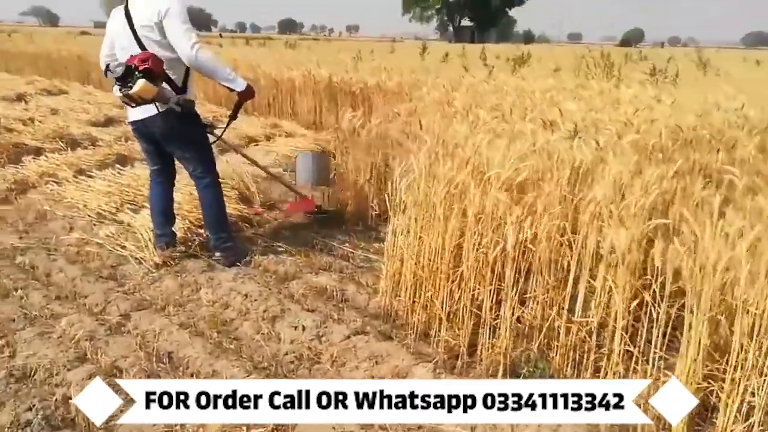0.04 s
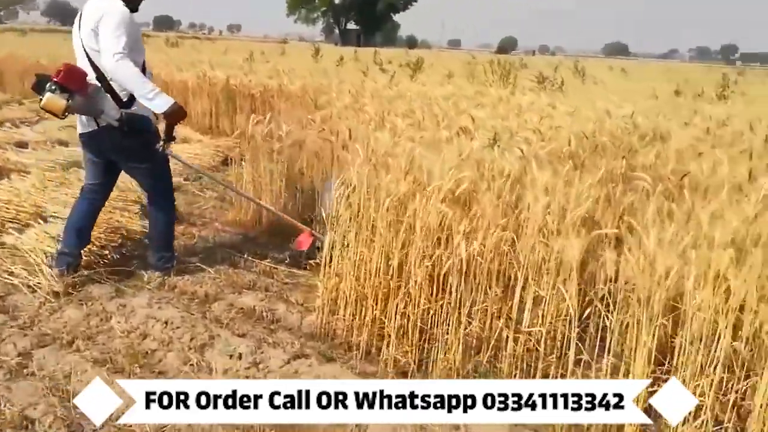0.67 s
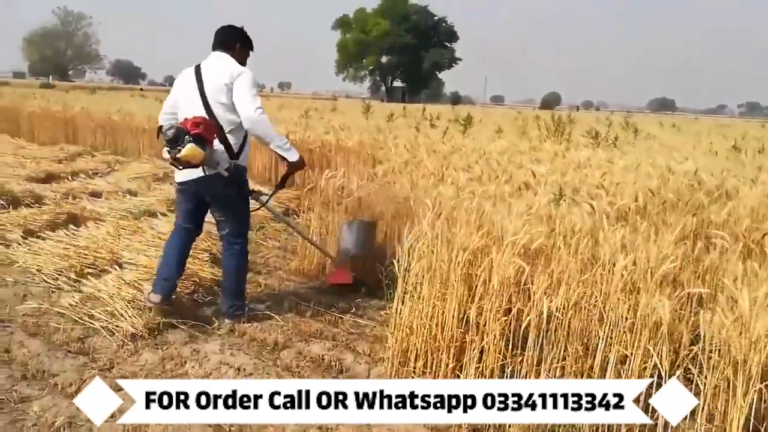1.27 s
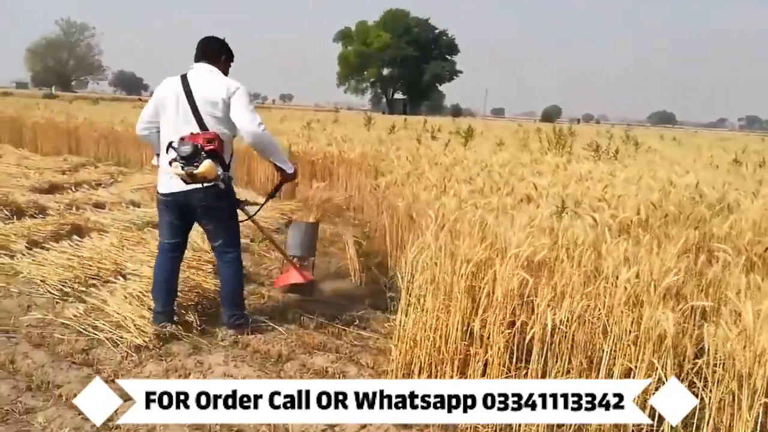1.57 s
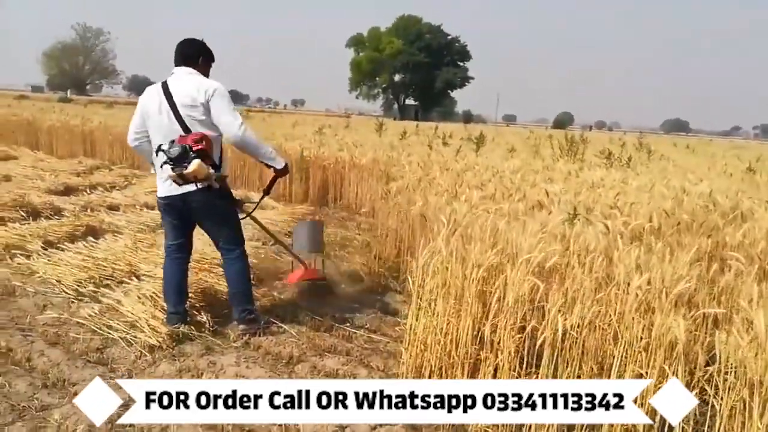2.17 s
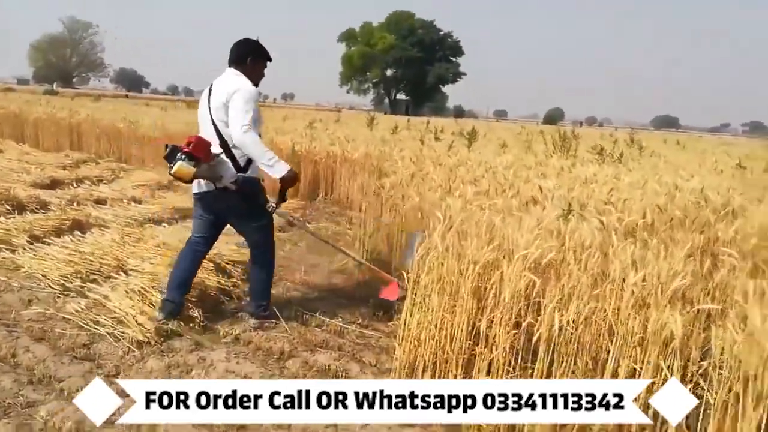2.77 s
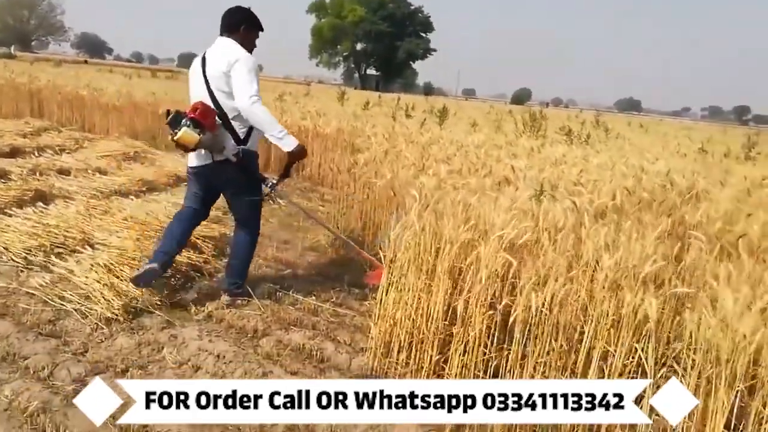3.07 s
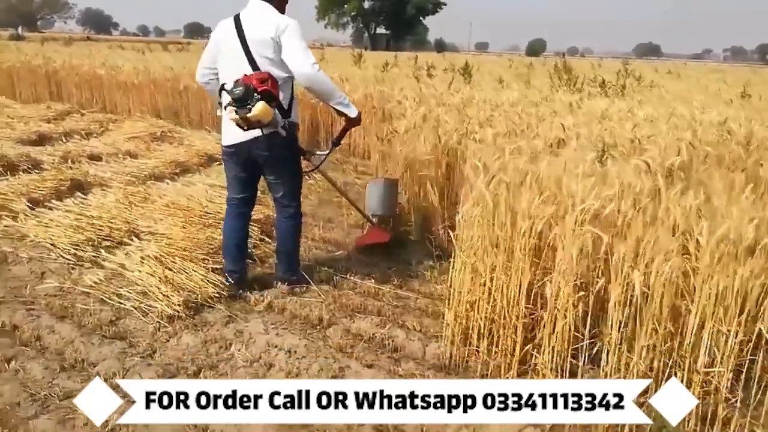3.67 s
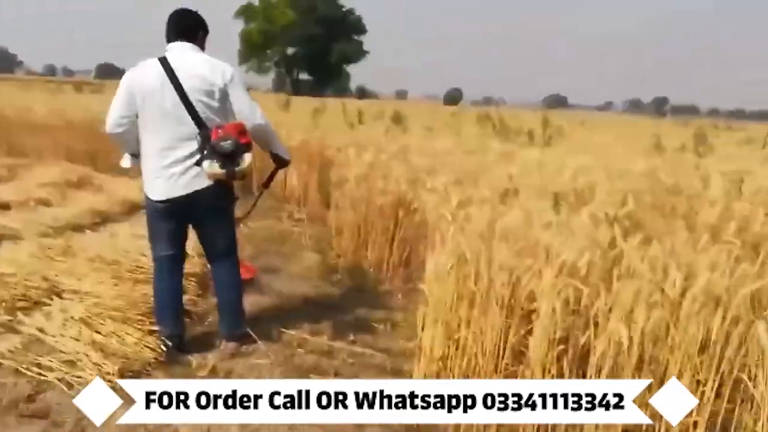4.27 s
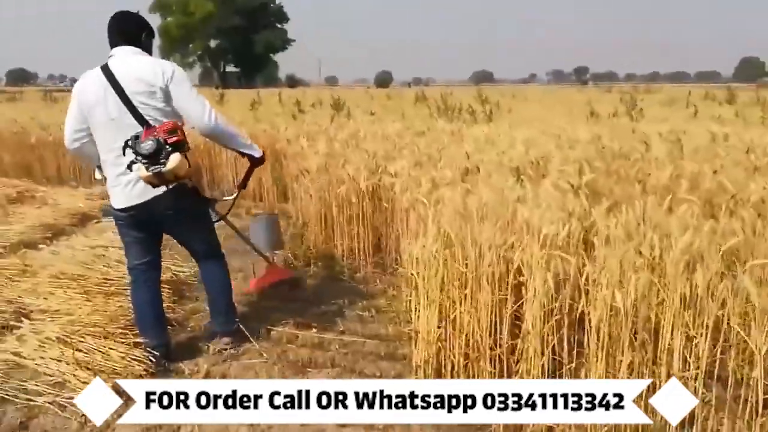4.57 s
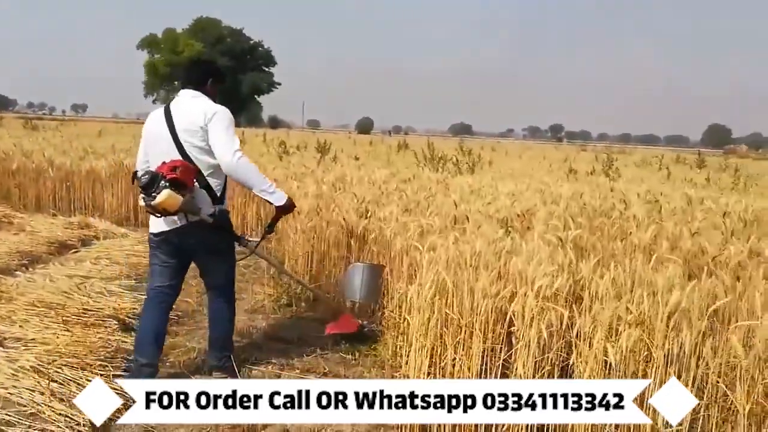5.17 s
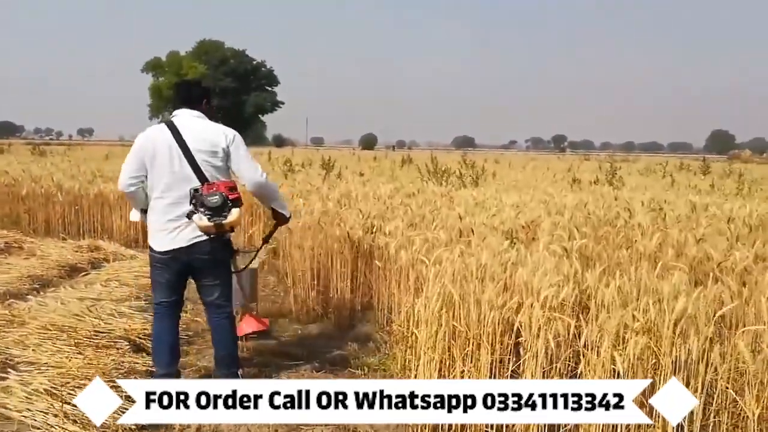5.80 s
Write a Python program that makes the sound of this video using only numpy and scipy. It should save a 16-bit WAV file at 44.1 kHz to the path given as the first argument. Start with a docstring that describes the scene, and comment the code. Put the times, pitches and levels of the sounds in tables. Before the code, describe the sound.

A petrol brush cutter runs throughout, a few metres from a phone microphone in an open field. Its small engine makes a buzzing drone with a fast rattle, whirring gears and a thin blade whine, over a light hiss of straw. The pitch climbs slightly during the first second. From about 1 to 2 seconds the toothed blade rips through dry wheat in a run of bright zings and crackles, and the engine sags to its lowest pitch. The shaft chatters in quick fits from roughly 1.5 to 2.3 seconds. The engine recovers by 3.2 seconds, then a second cluster of cuts from 3.3 to 4 seconds pulls it down a little, with a metallic rasp. It rises again, slightly louder, before a last series of sharp zings and tearing stalks from about 5.2 to 5.9 seconds. The engine is still running at the end.

```python
"""Brush cutter in dry wheat.

A four-stroke brush cutter mows an open field, a few metres from a phone. Gas pulses thud and valves
rattle the casing each cycle. The engine sags under load; gears whirr, the shaft chatters at low speed.
On each swing the saw teeth rip through stalks with a bright zing, and falling straw crackles."""
import sys
import numpy as np
from scipy import signal
from scipy.fft import rfft, irfft, next_fast_len
from scipy.io import wavfile
from scipy.ndimage import uniform_filter1d

SR = 44100
rng = np.random.default_rng(int(sys.argv[2]) if len(sys.argv) > 2 else 0)


def waveform_to_disk(signal):
    """Save audio, clipped to [-1, 1], as 16-bit WAV at the path in sys.argv[1]."""
    frames = np.transpose(np.atleast_2d(signal))
    scaled = np.clip(frames, -1, 1) * 32767
    samples = np.round(scaled).astype(np.int16)
    wavfile.write(sys.argv[1], SR, samples)


N = 261954
STEP = 32  # samples per control value
CRUISE_HZ = 46
TEETH_PER_FIRING, MESH_PER_FIRING, BLADE_TEETH = 60.2, 30.4, 40

# firing rate, sagging in each cut (time [s], rate [Hz])
FIRING_HZ = [(0.0, 47.61), (0.4, 48.9), (0.78, 50.08), (1.02, 50.38), (1.11, 48.78), (1.32, 48.24),
             (1.45, 45.66), (1.6, 42.9), (1.97, 40.69), (2.3, 43.0), (2.55, 44.43), (2.78, 46.0),
             (3.13, 47.87), (3.29, 48.39), (3.52, 45.98), (3.78, 45.19), (4.04, 43.72), (4.28, 45.18),
             (4.52, 46.11), (4.8, 47.05), (5.06, 48.07), (5.39, 47.47), (5.55, 46.74), (5.71, 45.72),
             (5.94, 45.54)]
# worker's swing: 0 = blade out, 1 = blade hidden, muffler facing (time [s], turn [0-1])
TURN = [(0, 0.27), (.75, 0.32), (1.3, 0.31), (2, 0.4), (2.5, 0.034), (3.1, 0.099), (3.6, 0.11), (4.2, 0.84),
        (4.5, 0.76), (5, 0.44), (5.45, 0.38), (5.94, 0.73)]
# exhaust swell (time [s], level [dB])
SWELL_DB = [(0, -3), (1.1, -1), (1.8, -2.5), (2.15, -1.1), (3.1, 1), (4.2, 1), (5.4, 2.5), (5.94, 0.5)]
# part: (base gain [dB], speed slope [dB/Hz], gain at full turn [dB], swell weight [ratio])
PART_GAINS = {"drone": (-38, 0.23, -0.4, 0.5), "note": (-0.43, 0.03, 0.12, 1), "bark": (.5, .45, 0, 0),
              "buzz": (1, 0, 0, 0), "chuff": (-37.5, -.1, 3.5, 0.3), "gears": (-39.5, -.2, 3, -.3),
              "rattle": (-24.5, 0.09, -7.5, 0.62), "fittings": (-39, -0.1, -5, -1),
              "straw": (-26, 0.44, -3, 0.78), "air": (-40.5, -0.13, -1.5, 0.9)}

# Order = multiple of the firing rate.
# muffler drone (order [1], level [dB], phase [cycles])
DRONE_LINES = [(1, -12.5, 1), (2, -1, 0.34), (3, -9.5, 0.31)]
# gas pulses (phase [cycles], level [dB])
GAS_PULSES = [(.475, 2), (.14, -2.5), (.77, -7)]
# exhaust note (order [1], level turned away [dB], level facing [dB])
NOTE_LINES = [(4, -51.5, -47.5), (5, -51.5, -45.5), (6, -49, -40.5), (7, -49, -46), (8, -45, -46),
              (9, -47, -48), (10, -49, -55), (11, -42, -55.5), (12, -57, -76)]
# hard edge of the exhaust pulse (order [1], level turned away [dB], level facing [dB])
BARK_LINES = [(14, -58.5, -63.5), (15, -66, -61), (16, -67, -53), (17, -65, -43), (18, -51, -48),
              (19, -56, -41.5), (20, -58, -40), (21, -48, -59)]
# bark envelope (time [s], gain [dB])
BARK_DB = [(0, 0.5), (4.1, 2.5), (5.4, -2.5), (5.94, 1)]
# muffler shell buzz (order [1], level turned away [dB], level facing [dB])
BUZZ_LINES = [(23, -53.5, -50.5), (24, -56, -40.5), (25, -46.5, -45.5), (26, -39.5, -52.5),
              (27, -47.5, -47), (28, -48, -75), (29, -46, -73), (33, -47.5, -44), (34, -43, -62),
              (35, -38.5, -63), (36, -46.5, -47), (37, -65, -72)]
# buzz envelope (time [s], gain [dB])
BUZZ_DB = [(0, -17), (1.9, -7), (2.6, -7), (3.3, 1), (4.2, -0.5), (5.2, -1.5), (5.5, 3.5), (5.7, -1),
           (5.94, -2)]
# gas noise bursts (phase [cycles], level [dB])
CHUFFS = [(0.41, -4.5), (0.53, -7), (0.16, -8), (0.76, -11.5)]
# muffler outflow spectrum (frequency [Hz], gain [dB])
CHUFF_SPECTRUM = [(300, -18), (620, -30), (850, -6.5), (1400, -3), (2000, -3.5), (3000, -3), (6000, -32),
                  (16000, -47)]

# fin and shaft tube modes (frequency [Hz], width [Hz], level [dB])
FIN_MODES = [(3680, 160, 2), (4020, 160, -18), (5260, 210, 1), (5730, 130, -12), (6200, 130, -0.5),
             (6450, 150, -2), (7130, 170, 1), (7450, 110, -1), (8050, 250, -6)]
# their ringing (time [s], level [dB])
FIN_DB = [(0, -36), (1.2, -38), (2, -35.5), (2.6, -37.5), (3.2, -46), (3.95, -28), (4.2, -35), (4.45, -40),
          (4.8, -29.5), (5.3, -35.5), (5.72, -33), (5.94, -36)]
# valve and piston knocks (phase [cycles], level [dB])
KNOCKS = [(.13, 5.5), (.4, 5.5), (0.501, 6.5), (0.721, 14.5), (0.899, 1.5)]
# casing response (frequency [Hz], gain [dB])
CASING_SPECTRUM = [(300, -47), (650, -31), (900, -7), (1350, 2.5), (1650, -.5), (1950, -1), (2300, 2.5),
                   (2800, 1.5), (3400, -3), (4500, -2), (6500, -12.5), (10000, -5), (16000, -16)]
# echoes off worker, guard and soil (delay [s], gain [dB])
ECHOES = [(.00115, -15), (.0022, -13), (.0037, -14)]
# cowl and guard modes (frequency [Hz], width [Hz], level [dB])
FITTING_MODES = [(2124, 90, -7.5), (2593, 100, -14), (2850, 130, -14)]
# gear whirr (order [1], level [dB])
GEAR_LINES = [(28, 4.5), (30, 5.5), (31, 0), (36, -8), (39, -14), (42, -4), (44, -0.5), (45, 4), (49, -12),
              (56, -15)]
# cooling air spectrum (frequency [Hz], gain [dB])
AIR_SPECTRUM = [(20, -25), (38, -21), (60, -19), (100, -2), (145, -0.5), (210, -6.5), (450, -5.5),
                (620, -17.5), (1000, -6.5), (3000, -48)]
# gear head whine (time [s], level [dB])
MESH_DB = [(0, -43), (.5, -36), (.9, -39), (1.5, -47), (2.2, -45), (2.6, -34), (3.3, -37), (4.05, -37),
           (4.6, -45), (5.5, -43), (5.85, -35)]
# fits of shaft chatter (start [s], peak [dB])
CHATTER_FITS = [(1.555, -27), (1.6142, -25), (1.6656, -26), (1.72, -25), (1.7752, -24.5), (1.8244, -25),
                (1.876, -29), (1.9275, -26), (1.9759, -25.5), (2.0497, -29), (2.1031, -24.5), (2.1742, -28),
                (2.2488, -25), (2.3092, -28)]

# straw hiss spectrum (frequency [Hz], gain [dB])
STRAW_SPECTRUM = [(1000, -35.5), (3000, -2), (4000, -4), (4700, -3), (5700, 5), (7300, 5), (9000, -1),
                  (10500, -1), (11800, -2), (13000, -2.5), (14000, 0), (16000, -7.5)]
# free blade whine (time [s], level [dB])
WHINE_DB = [(0, -42), (.33, -38), (.45, -32), (.75, -31.5), (.95, -33.5), (1.09, -28), (1.22, -35),
            (1.47, -30), (1.62, -37), (1.9, -34), (2.3, -33), (2.5, -37), (2.8, -34), (3.1, -36),
            (4.4, -41), (5.94, -32)]
# blade meets stalks (centre [s], half length [s], level [dB], zing share [0-1], favoured harmonic [1])
CUTS = [(1.038, 0.017, -20, .85, 2), (1.078, 0.03, -15.5, 0.65, 4.5), (1.177, 0.018, -19.5, 0.4, 4),
        (1.35, 0.03, -17.5, 0.8, 3.5), (1.445, 0.093, -24, 0.24, 2.5), (1.561, 0.026, -21, 0.22, 5),
        (1.642, 0.042, -25.5, 0.3, 3), (1.75, 0.023, -29.5, 0.35, 5), (1.855, 0.037, -34, 0.4, 5),
        (1.925, 0.042, -28.5, 0.1, 5), (3.289, 0.012, -21, 0.7, 3), (3.336, 0.026, -14.5, 0.65, 5),
        (3.41, .035, -25, 1, 5), (3.438, 0.051, -20.5, 0.66, 3), (3.517, 0.064, -23.5, 0.2, 2),
        (3.725, 0.023, -21, 0.1, 4), (3.771, 0.021, -19.5, 0.2, 4), (3.945, 0.13, -26, 0, 4),
        (5.174, 0.061, -25, 0.5, 2), (5.431, 0.012, -17, 0.76, 4), (5.447, 0.0067, -10, 1, 4),
        (5.489, 0.019, -12.5, 0.55, 4), (5.53, 0.029, -26.5, .07, 3), (5.564, 0.014, -18.5, 0.4, 4),
        (5.672, 0.011, -22.5, 0.7, 4), (5.887, 0.026, -28, 1, 4)]
# tooth zing (tooth rate harmonic [1], level [dB])
ZING_LINES = [(1, -15), (2, -14.5), (3, -5), (4, -16), (5, -3.5)]
# steel blade response (frequency [Hz], gain [dB])
PLATE_SPECTRUM = [(2000, 5), (3000, -1.5), (4400, -5), (5750, 8.5), (7000, 8.5), (8600, -1.5), (10000, 7),
                  (11500, 8), (12800, 1), (14400, -9.5), (16000, -4)]
# tearing stalk spectrum (frequency [Hz], gain [dB])
RIP_SPECTRUM = [(500, -36), (1500, 0), (2900, 6), (3500, 1), (4500, -1), (5800, 8), (8500, 7.5),
                (10000, 7.5), (11500, 7.5), (13000, 7), (16000, -10)]
# cutting noise balance (time [s], left minus right [dB])
CUT_PAN_DB = [(0, 2.5), (1.1, 0), (1.35, 0), (3.2, 1), (3.5, 0), (4.05, 3.5), (5.25, -1), (5.47, -1),
              (5.94, -2.5)]
# microphone port shading (frequency [Hz], left minus right [dB])
PORT_SHADING = [(450, -6.5), (700, 8), (950, 2), (1300, -0.5), (1750, -9), (2300, -4), (2800, -1),
                (3300, -4), (4400, -0.5), (6200, 6), (8500, -0.5), (11000, -4), (15000, -8)]


def amp(db):
    """Decibels to gain."""
    return 10 ** (np.asarray(db) / 20)


def unit(x):
    """Scale to rms 1."""
    return x / np.sqrt(np.mean(x ** 2))


def curve(table):
    """Breakpoints to one value per sample."""
    return np.interp(np.arange(N) / SR, *np.transpose(table))


def hold(x, size=STEP):
    """Control rate to sample rate."""
    return np.repeat(x, size)[:N]


def walk(rate_hz):
    """Smooth random drift, rms 1."""
    size = max(int(SR / rate_hz / 100), 1)
    span = max(int(SR / rate_hz / size), 1)
    steps = np.diff(rng.standard_normal(N // (span * size) + 2), prepend=0)
    ramps = np.cumsum(np.repeat(steps / span, span))
    return hold(unit(uniform_filter1d(ramps, span // 2 + 1)), size)


def noise():
    """Independent white noise per port."""
    return rng.standard_normal((2, N))


def colour(x, spectrum, size=8192):
    """Minimum-phase filter with the given response."""
    hz, db = np.transpose(spectrum)
    grid_hz = np.maximum(np.fft.rfftfreq(size, 1 / SR), 1)
    cepstrum = irfft(np.log(amp(np.interp(np.log(grid_hz), np.log(hz), db))))
    cepstrum[1:size // 2] *= 2
    cepstrum[size // 2 + 1:] = 0
    response = irfft(np.exp(rfft(cepstrum)))
    return signal.fftconvolve(np.atleast_2d(x), response[None], axes=1)[:, :N]


def pan(db):
    """Port gains for a left-minus-right balance."""
    return amp(np.array([db, -db]) / 2)


def from_left(x, lag_s=0.00014):
    """Direct sound reaches the right port later."""
    x, size = np.ravel(x), next_fast_len(N, real=True)
    delay = np.exp(-2j * np.pi * np.fft.rfftfreq(size, 1 / SR) * lag_s)
    return np.array([x, irfft(rfft(x, size) * delay, size)[:N]])


def scatter(x, tail_s, wet_share):
    """Direct sound plus a spray of reflections off soil and stalks."""
    t = np.arange(SR // 20) / SR
    spray = rng.standard_normal((2, len(t))) * np.exp(-t / tail_s)
    spray /= np.linalg.norm(spray, axis=1, keepdims=True)
    wet = signal.fftconvolve(np.atleast_2d(x), spray, axes=1)[:, :N]
    return np.sqrt(1 - wet_share) * unit(from_left(x)) + np.sqrt(wet_share) * unit(wet)


def moving_echoes(x, drift_s=0.00011):
    """Echo paths drift as the worker moves; peaks and dips wander."""
    at = np.arange(N)

    def echo(port, delay_s):
        return np.interp(at - SR * (delay_s + drift_s * walk(1.2)), at, port)

    return unit(np.array([port + sum(amp(db) * echo(port, s) for s, db in ECHOES) for port in x]))


def part_gain(part):
    """Gain from engine speed, turn and exhaust swell."""
    base_db, db_per_hz, turned_db, weight = PART_GAINS[part]
    hz, turn, swell_db = (curve(table)[::STEP] for table in (FIRING_HZ, TURN, SWELL_DB))
    return hold(amp(base_db + db_per_hz * (hz - CRUISE_HZ) + turned_db * turn + weight * swell_db))


def surge(cycle, depth_db, phase):
    """Gain swelling once a cycle, peaking at phase."""
    return unit(hold(amp(depth_db / 2 * np.cos(2 * np.pi * (cycle[::STEP] - phase)))))


def throb(cycle, depth_db, phase):
    """Gain jumping at each firing, sinking until the next."""
    age = (cycle - phase) % 1
    return unit(uniform_filter1d(amp(-depth_db * age), SR // 500))


def valve_pop(cycle):
    """Steady gain with a bump as the exhaust valve opens."""
    age = (cycle - GAS_PULSES[0][0] + .5) % 1 - .5
    return unit(1 + .8 * np.exp(-(age / .13) ** 2))


def pulse_lines(cycle, lines, waver, lead_cycles=0):
    """Firing harmonics peaking on the gas pulses; their balance follows the turn."""
    out, angle = 0, 2 * np.pi * (cycle + lead_cycles)
    turn = curve(TURN)[::STEP]
    for order, away_db, facing_db in lines:
        pulses = sum(amp(db) * np.exp(-2j * np.pi * order * phase) for phase, db in GAS_PULSES)
        gain = hold(np.sqrt(2) * amp(away_db + turn * (facing_db - away_db)))
        out -= gain * wavering(order * angle + np.angle(pulses), waver, rate_hz=14)
    return out


def wavering(angle, depth, rate_hz):
    """Tone drifting in level and phase."""
    return np.cos(angle) * (1 + depth * walk(rate_hz)) + np.sin(angle) * depth * walk(rate_hz)


def exhaust(cycle, jitter_cycles=0.0016, spread_db=1.1, chuff_cycles=0.028):
    """Gas pulses bark over a drone; as the valve opens, gas chuffs out and the muffler shell buzzes."""
    drone = sum(amp(db + 0.29 * walk(25.1)) * np.cos(2 * np.pi * order * (cycle - phase))
                for order, db, phase in DRONE_LINES)
    note = pulse_lines(cycle, NOTE_LINES, waver=0.095)
    uneven = cycle + jitter_cycles * walk(70)
    strength = amp(spread_db * walk(70))
    bark = pulse_lines(uneven, BARK_LINES, waver=0.22, lead_cycles=0.04) * amp(curve(BARK_DB))
    buzz = pulse_lines(uneven, BUZZ_LINES, waver=0.59, lead_cycles=0.0422) * amp(curve(BUZZ_DB))
    bursts = sum(amp(db) * np.exp(-(((cycle - phase + .5) % 1 - .5) / chuff_cycles) ** 2)
                 for phase, db in CHUFFS)
    chuff = unit(colour(rng.standard_normal(N) * bursts, CHUFF_SPECTRUM))
    smooth = unit(drone) * part_gain("drone") + note * part_gain("note")
    rough = bark * part_gain("bark") + buzz * part_gain("buzz") + chuff * part_gain("chuff")
    return from_left(smooth + rough * strength)


def fins(cycle):
    """Each firing shakes a metallic rasp from fins and shaft tube; the modes trade strength."""
    t = np.arange(N) / SR
    ring = 0
    for hz, width_hz, db in FIN_MODES:
        tone = amp(db + 3.5 * np.tanh(walk(6))) * np.sin(2 * np.pi * hz * t)
        ring += tone * np.array([walk(2 * width_hz), walk(2 * width_hz)])
    shake = surge(cycle, depth_db=8, phase=.45) * amp(1.5 * walk(60))
    return unit(ring * shake) * amp(curve(FIN_DB))


def knocks(cycle, spread_db=4.5, jitter_cycles=0.0038, count=400):
    """Valve and piston impacts, each slightly off in size and timing."""
    out = np.zeros(N + 1)
    for phase, db in KNOCKS:
        slip, force = rng.uniform(-1, 1, (count, 2)).T
        due = np.arange(count) + phase + jitter_cycles * slip
        at = np.interp(due, cycle, np.arange(N), left=-1, right=-1)
        size, at = amp(db + spread_db * force)[at >= 0], at[at >= 0]
        np.add.at(out, at.astype(int), size * (1 - at % 1))
        np.add.at(out, at.astype(int) + 1, size * (at % 1))
    return out[:N]


def casing(cycle):
    """Knocks and a gas rasp ring the casing; its partials shift as it turns."""
    blows, angle = knocks(cycle), np.pi * curve(TURN)
    ring = sum(side * scatter(blows, tail_s=0.013, wet_share=1)
               for side in (np.cos(angle), np.sin(angle)))
    rasp = unit(noise() + .8 * from_left(rng.standard_normal(N)))
    rasp = rasp * throb(cycle, depth_db=8.5, phase=.36) * amp(.6 * walk(70))
    rattle = moving_echoes(colour(rasp + amp(-2) * ring, CASING_SPECTRUM))
    return rattle * amp(0.78 * walk(15)) * part_gain("rattle")


def fittings(cycle):
    """Loose cowl and guard chatter, more at low speed."""
    t = np.arange(N) / SR
    ring = sum(amp(db + 3.3 * np.tanh(walk(21))) * np.sin(2 * np.pi * hz * t) * walk(width_hz)
               for hz, width_hz, db in FITTING_MODES)
    return from_left(unit(ring * valve_pop(cycle))) * part_gain("fittings")


def gears(cycle, backlash=0.42):
    """Gear teeth sing on firing harmonics, jolted by each firing and wavering with backlash."""
    whirr = sum(amp(db) * wavering(2 * np.pi * (order * cycle + rng.random()), backlash, rate_hz=16)
                for order, db in GEAR_LINES)
    return scatter(whirr * valve_pop(cycle), tail_s=0.004, wet_share=0.1) * part_gain("gears")


def cooling_air():
    """Air rushes out of the cowl."""
    return from_left(unit(colour(rng.standard_normal(N), AIR_SPECTRUM))) * part_gain("air")


def shaft(cycle, fit_s=0.034, overtone_db=-7):
    """The gear head whines; dragged down by load, the shaft chatters at that pitch in short fits."""
    t = np.arange(0, N, STEP) / SR
    fits = hold(sum(amp(db) * np.sin(np.pi * np.clip((t - s) / fit_s, 0, 1)) for s, db in CHATTER_FITS))
    whine = amp(curve(MESH_DB) + 4 * np.tanh(walk(22))) * valve_pop(cycle)
    angle = 2 * np.pi * (MESH_PER_FIRING * cycle + np.cumsum(20 * walk(170)) / SR)
    return from_left((fits + whine) * (np.sin(angle) + amp(overtone_db) * np.sin(2 * angle)))


def snaps(rate_hz, skew_db):
    """Random clicks; a few much louder (skew > 0) or softer (skew < 0)."""
    size = amp(skew_db * np.minimum(rng.exponential(size=N), 4))
    return (rng.random(N) < rate_hz / SR) * size * rng.choice([-1, 1], N)


def straw(cycle, fall_db=-12, fall_s=0.12):
    """Straw stirred by the blade hisses and crackles, swelling as cut stalks fall."""
    t = np.arange(0, N, STEP) / SR
    fall_power = hold(sum(amp(db + fall_db) ** 2 * (t > s) * np.exp(-np.abs(t - s) / fall_s)
                          for s, _, db, *_ in CUTS))
    crackle = scatter(snaps(rate_hz=1300, skew_db=3), tail_s=0.0007, wet_share=0.84)
    hiss = (noise() + amp(-5) * crackle) * surge(cycle, depth_db=2.5, phase=.42)
    gain = np.sqrt(part_gain("straw") ** 2 + fall_power)
    return moving_echoes(colour(hiss, STRAW_SPECTRUM)) * amp(.9 * walk(20)) * gain


def blade_whine(tooth_angle):
    """The free blade sings roughly at its tooth rate, flickering."""
    tone = np.array([np.sin(tooth_angle) * walk(130) + np.cos(tooth_angle) * walk(130) for _ in range(2)])
    return tone / np.sqrt(2) * amp(curve(WHINE_DB) + 5 * np.tanh(walk(24)))


def cuts(tooth_angle, favour_db=6):
    """Teeth strike stalks in quick succession, a rough zing; the stalks tear and snap."""
    t = np.arange(0, N, STEP) / SR
    centre_s, half_s, cut_db, zing_share, favoured = np.transpose(CUTS)
    offset = (t - centre_s[:, None]) / half_s[:, None]
    power = amp(cut_db)[:, None] ** 2 * np.exp(-np.minimum(offset ** 2, 20))
    zing = 0
    for harmonic, db in ZING_LINES:
        boost = amp(favour_db * np.exp(-2 * (harmonic - favoured) ** 2))
        gain = amp(db) * hold(np.sqrt((zing_share * boost ** 2) @ power))
        cos, sin = np.cos(harmonic * tooth_angle), np.sin(harmonic * tooth_angle)
        zing += gain * np.array([cos * walk(480) + sin * walk(480) for _ in range(2)])
    snapping = scatter(snaps(rate_hz=2200, skew_db=-3), tail_s=0.0032, wet_share=1)
    rip = unit(colour(noise() + amp(13) * snapping, RIP_SPECTRUM))
    rip_gain = hold(np.sqrt((1 - zing_share) @ power))
    return (colour(zing, PLATE_SPECTRUM) + rip * rip_gain) * amp(2 * np.tanh(walk(140)))


def blade(cycle):
    """The blade runs out of true: whine and cuts flutter once a turn."""
    teeth = TEETH_PER_FIRING * cycle
    blur = np.cumsum(15 * walk(120)) / SR  # stalks meet the teeth at random moments
    tooth_angle = 2 * np.pi * (teeth + blur)
    wobble = surge(teeth / BLADE_TEETH, depth_db=4, phase=0)
    return (blade_whine(tooth_angle) + cuts(tooth_angle)) * wobble


def scene():
    """One engine speed drives all parts; the swing shows and hides them."""
    cycle = np.cumsum(curve(FIRING_HZ) * (1 + 0.001513 * walk(30))) / SR
    rattle_pan = pan(0.3 * curve(SWELL_DB))  # drifts left as the engine comes into the open
    engine = exhaust(cycle) + fins(cycle) + (casing(cycle) + fittings(cycle)) * rattle_pan
    machine = engine + gears(cycle) + cooling_air() + shaft(cycle)
    return machine + (straw(cycle) + blade(cycle)) * pan(curve(CUT_PAN_DB))


def record(dry, ceiling=0.72, cutoff_hz=15900):
    """The phone's body shades each port above the bass; peaks are rounded, the top is cut."""
    shading = [(380, 0)] + list(PORT_SHADING)
    left = colour(dry[0], [(hz, db / 2) for hz, db in shading])
    right = colour(dry[1], [(hz, -db / 2) for hz, db in shading])
    both = np.vstack([left, right])
    rounded = both / (1 + (both / ceiling) ** 4) ** 0.25
    return signal.sosfilt(signal.ellip(12, .2, 90, cutoff_hz, fs=SR, output="sos"), rounded)


dry = scene()
out = record(dry)
waveform_to_disk(out)
```